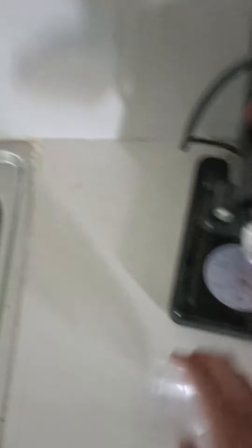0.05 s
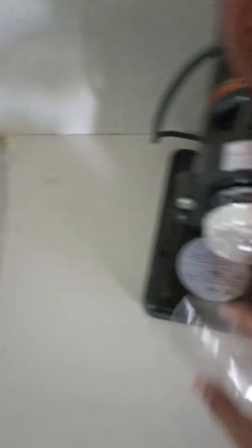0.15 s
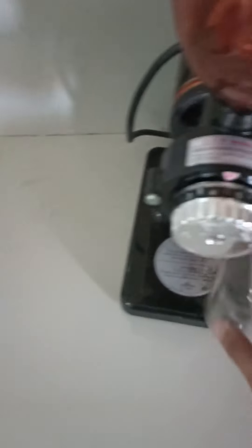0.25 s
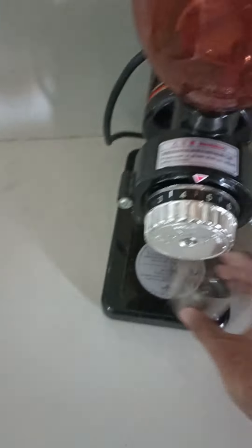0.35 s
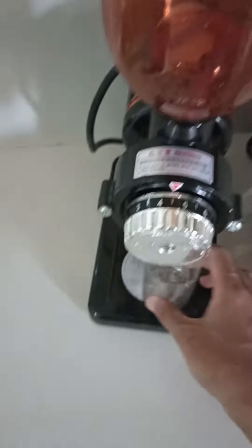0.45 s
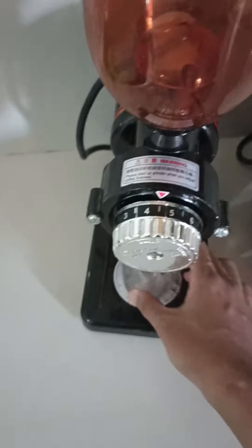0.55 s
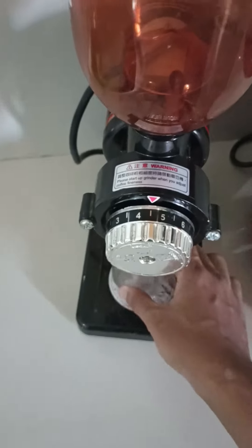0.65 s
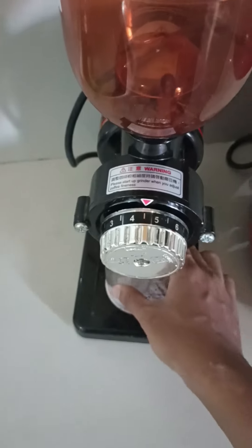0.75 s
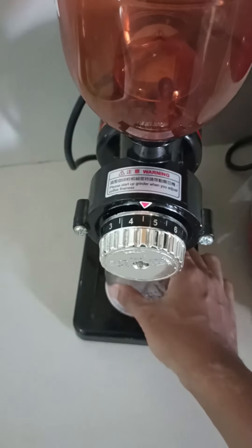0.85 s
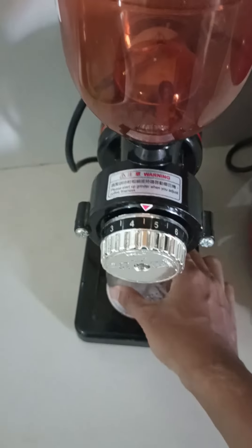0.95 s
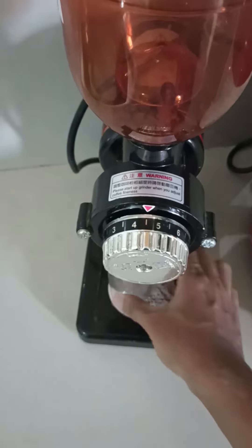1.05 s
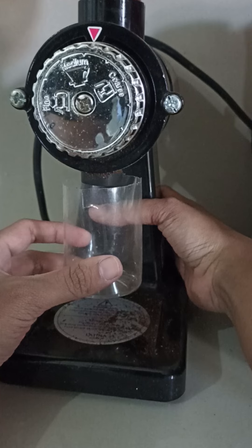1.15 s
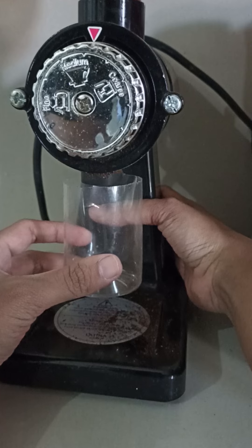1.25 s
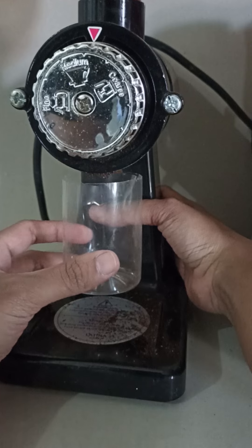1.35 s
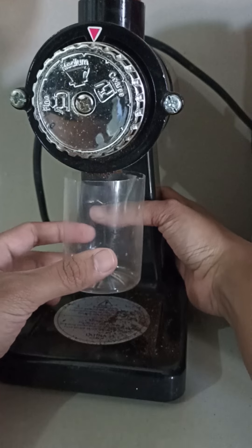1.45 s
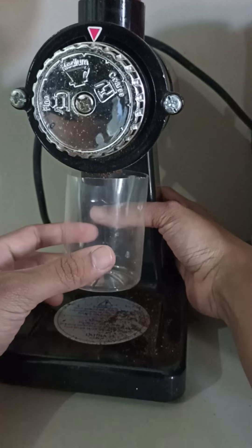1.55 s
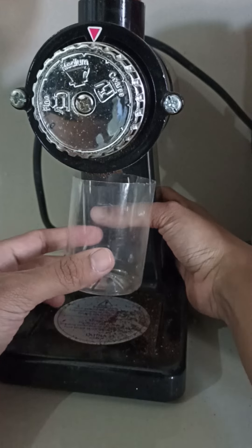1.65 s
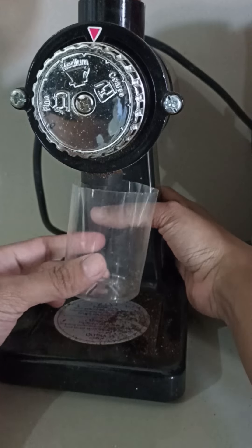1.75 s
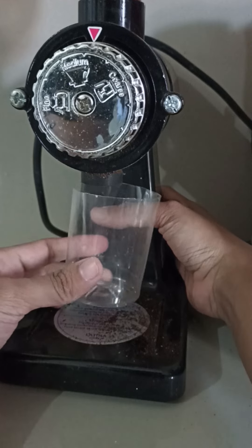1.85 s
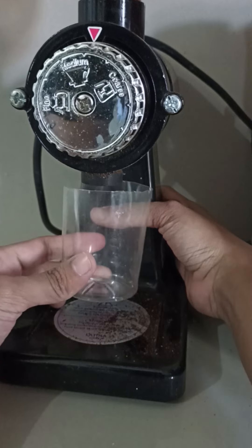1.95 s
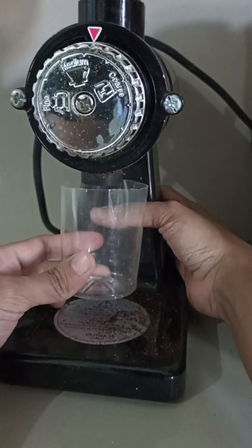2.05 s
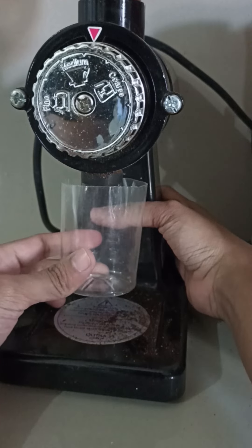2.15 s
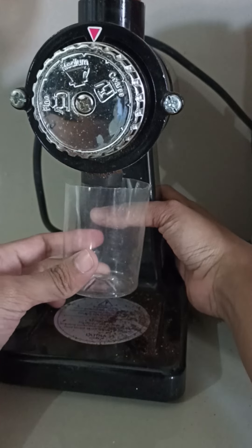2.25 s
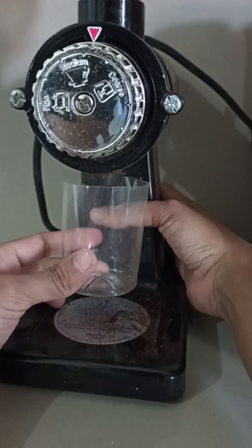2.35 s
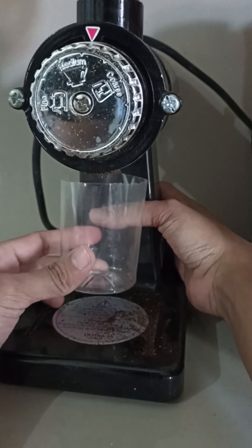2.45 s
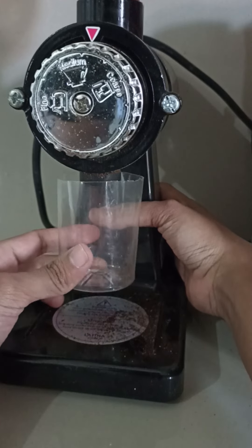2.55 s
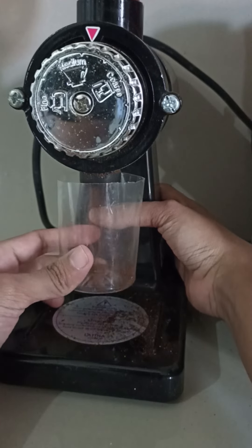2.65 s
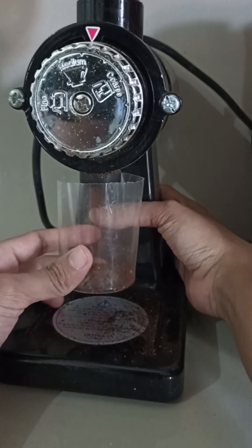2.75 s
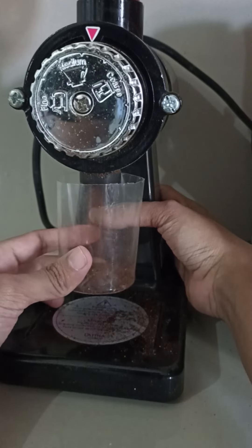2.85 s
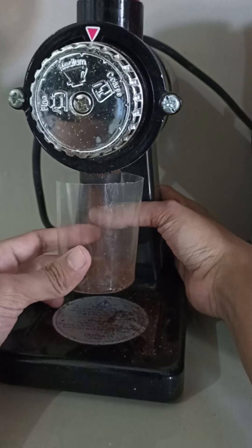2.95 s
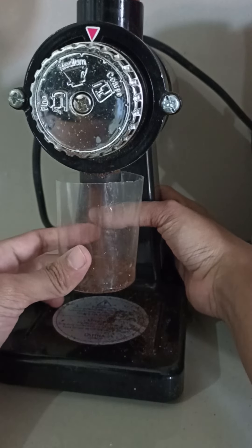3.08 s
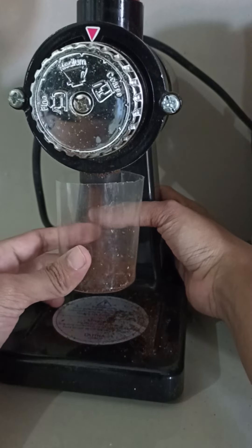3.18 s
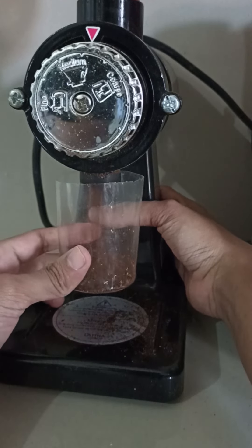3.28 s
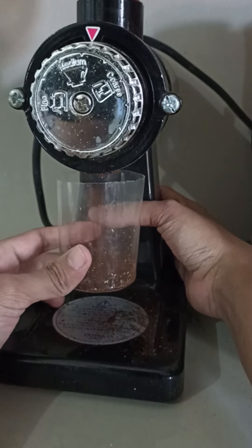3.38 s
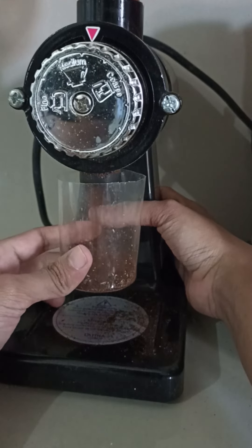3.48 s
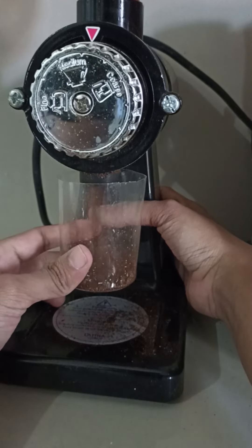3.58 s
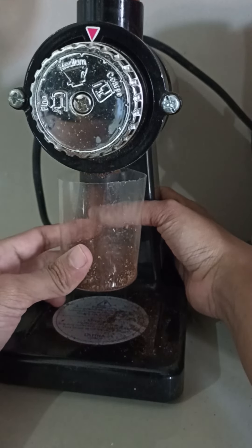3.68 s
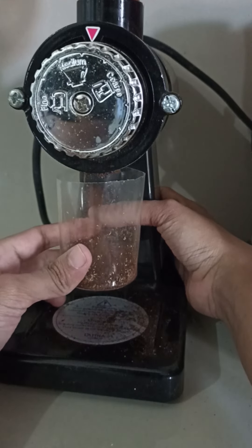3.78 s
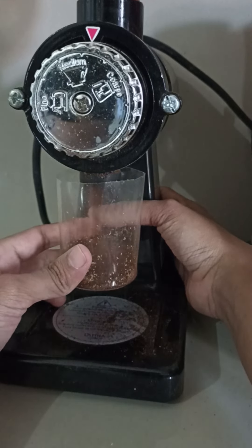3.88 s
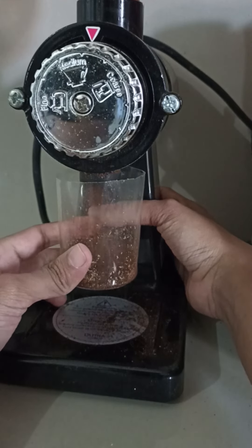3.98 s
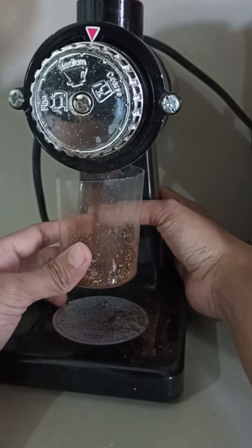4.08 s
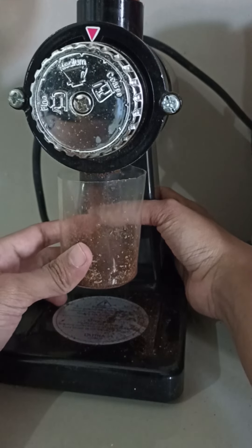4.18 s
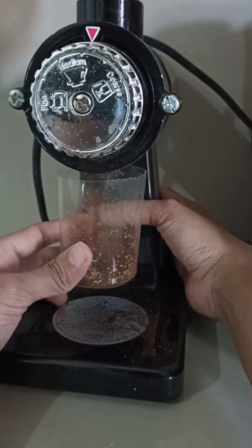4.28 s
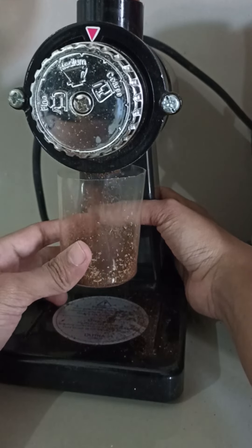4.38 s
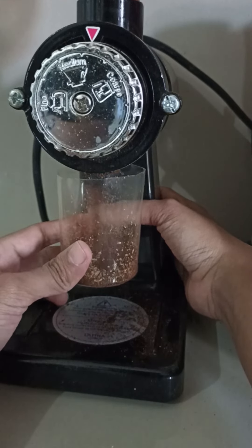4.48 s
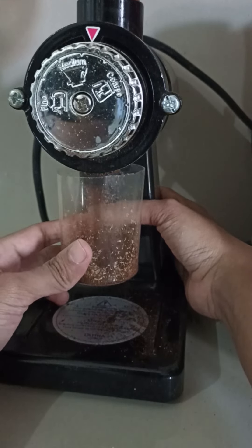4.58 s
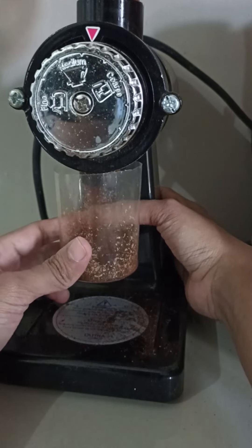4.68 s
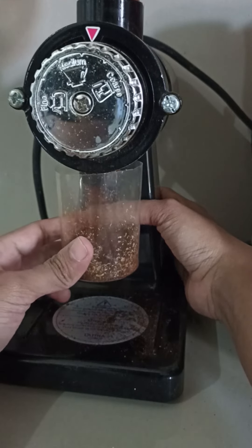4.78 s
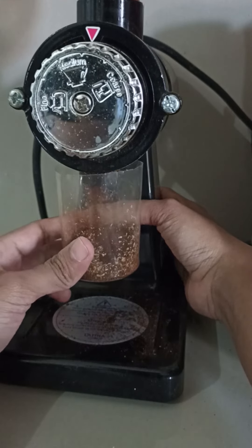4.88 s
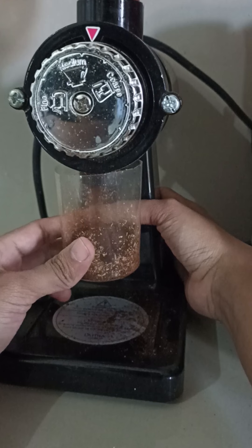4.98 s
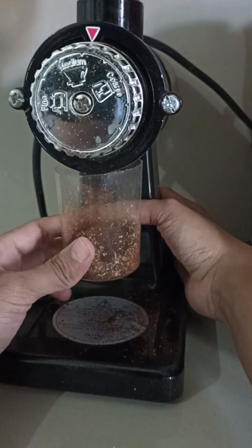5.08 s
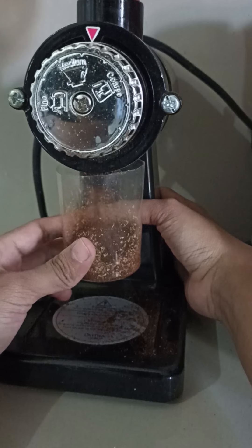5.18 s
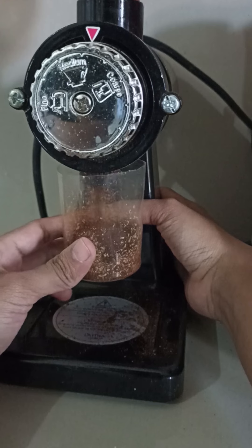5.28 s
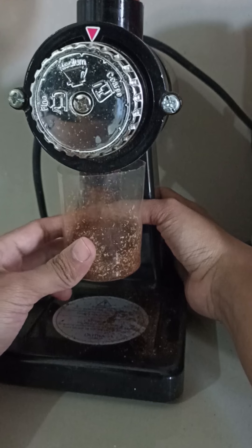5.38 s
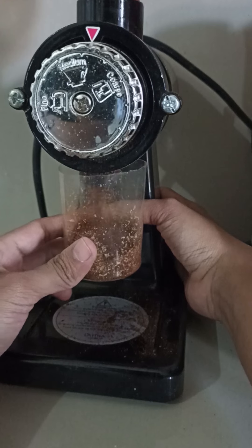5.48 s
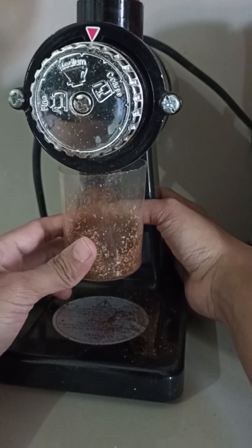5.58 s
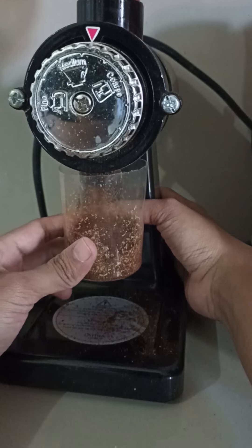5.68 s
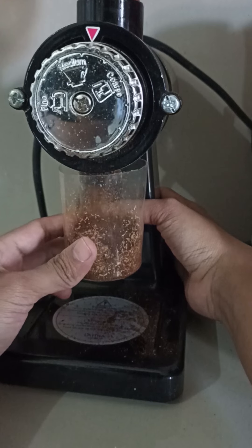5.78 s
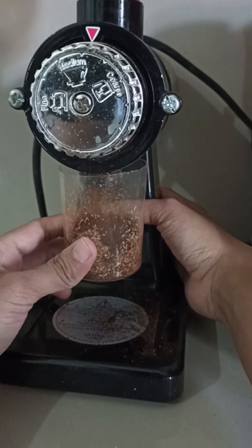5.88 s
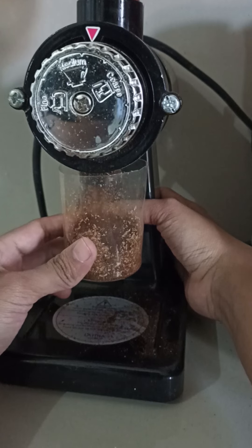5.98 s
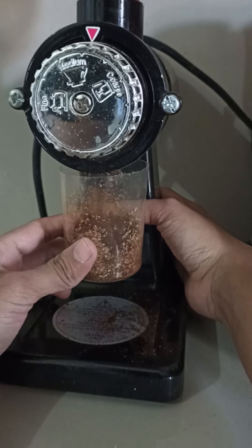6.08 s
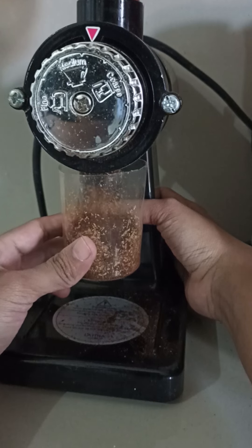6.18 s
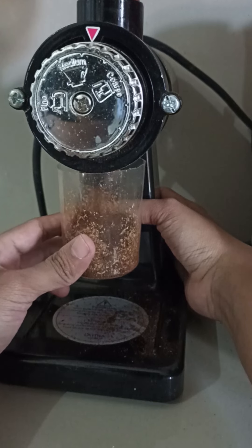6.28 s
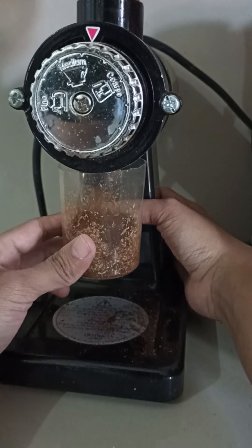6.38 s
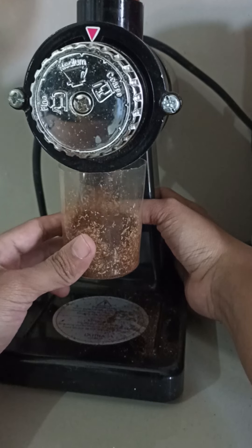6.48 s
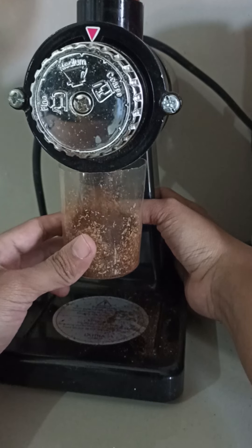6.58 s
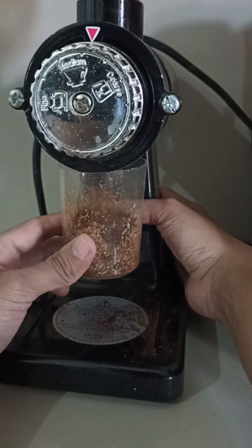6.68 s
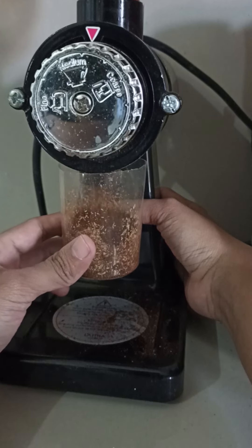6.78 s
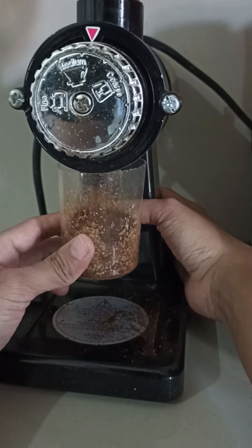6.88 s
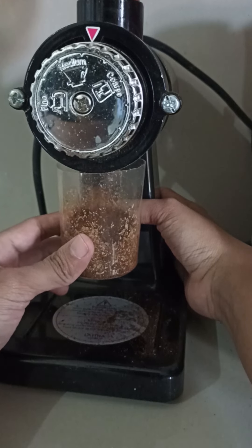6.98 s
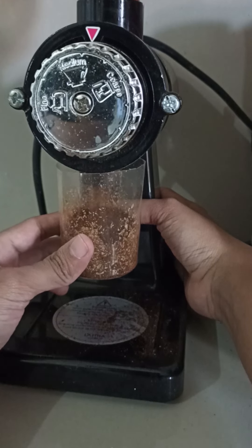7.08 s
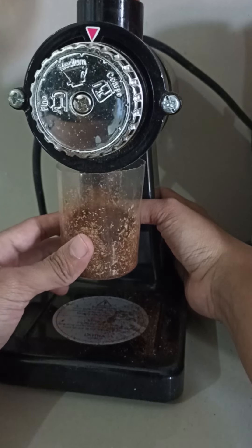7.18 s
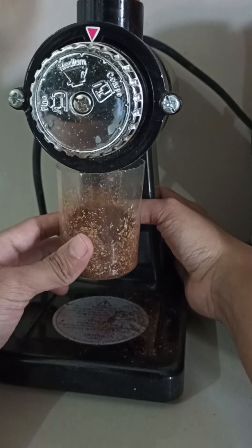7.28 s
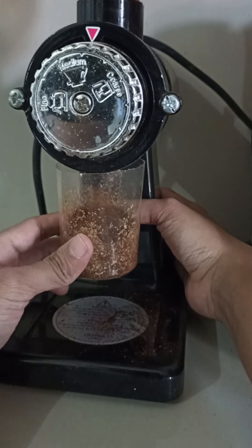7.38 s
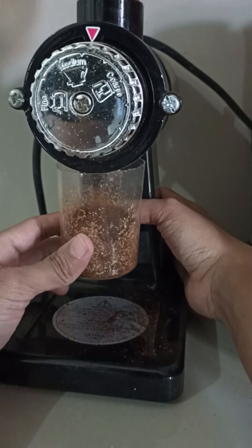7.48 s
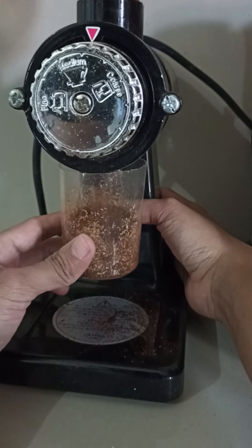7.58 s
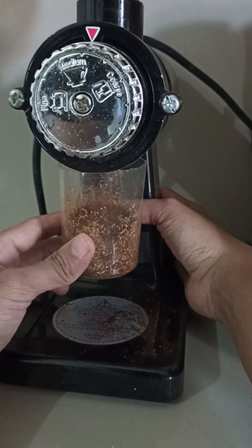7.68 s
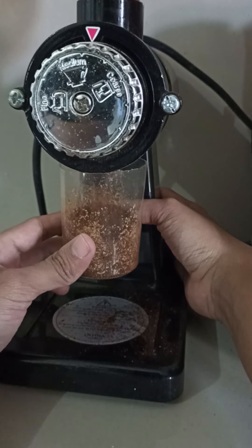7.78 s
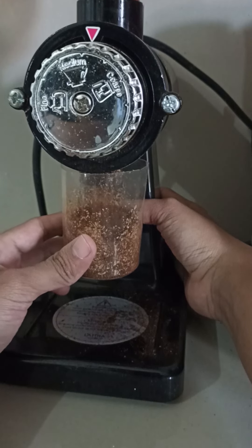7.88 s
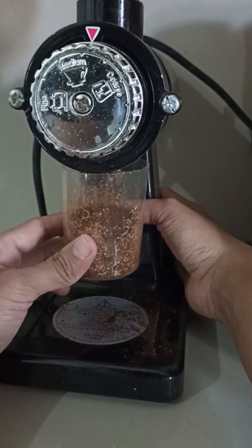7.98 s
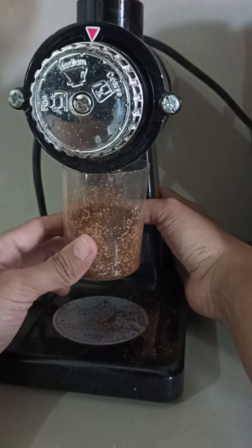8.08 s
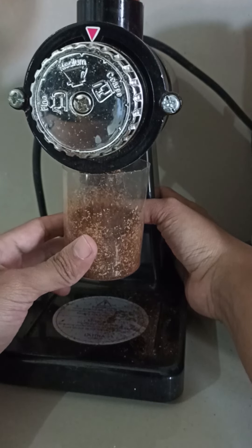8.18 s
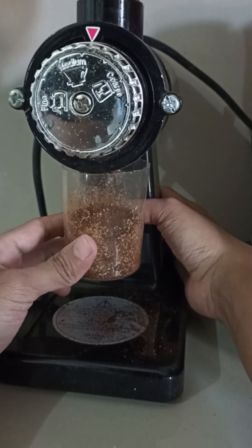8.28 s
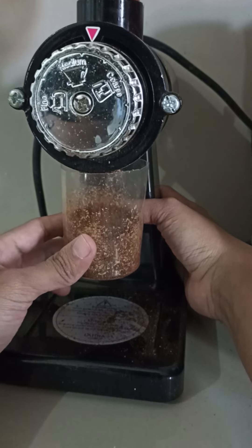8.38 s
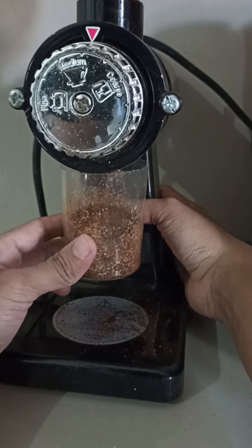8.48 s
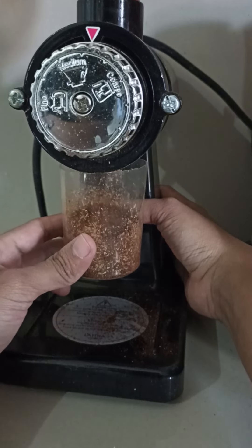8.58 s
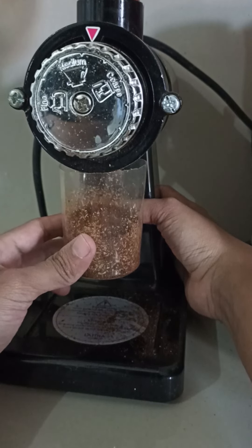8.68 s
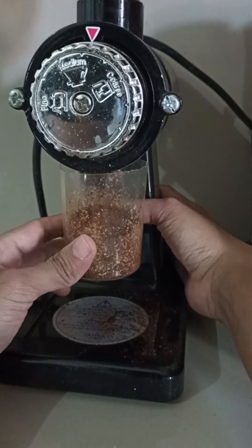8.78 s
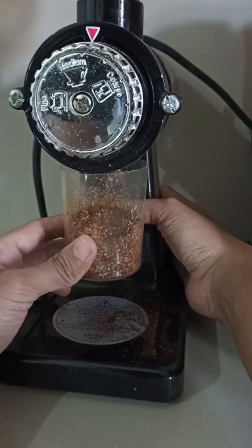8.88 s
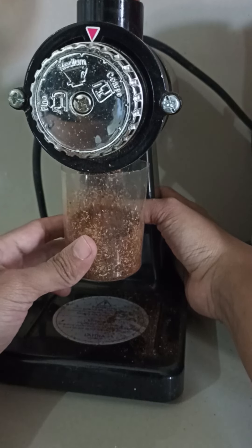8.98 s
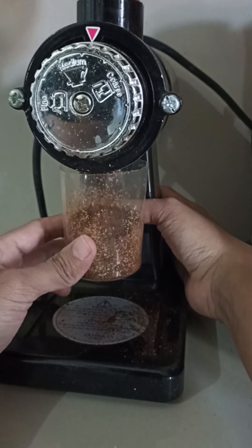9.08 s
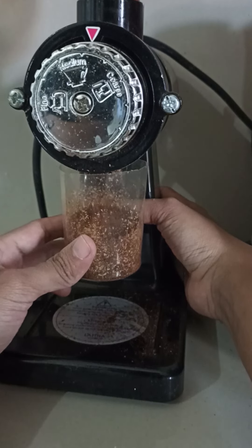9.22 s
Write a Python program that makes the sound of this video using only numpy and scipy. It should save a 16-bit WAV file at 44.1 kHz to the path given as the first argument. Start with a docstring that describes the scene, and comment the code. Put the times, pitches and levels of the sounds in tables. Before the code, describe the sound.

A quiet kitchen with soft room noise and a faint low hum that comes and goes, heard close up in stereo. A tiny hiss opens, with light crinkly plastic ticks at 0.2-0.4 s. At about 0.5 s the cup knocks the grinder base twice with a rattle between, a hollow low-mid ring trailed by hiss fading over half a second. Soft taps and a bump come near 0.9-1.1 s, then low hand rumble, with small taps around 1.85 s. At 2.5 s the motor clacks on and a loud, dense, gritty roar fills everything: crunching, thudding beans, bright grit, rough whine. It sags slightly until about 4.5 s, then gradually rises, with a brief squeak near 5.6 s and a hard crack at 6.3 s. Another squeak comes at 8.07 s; from 8.1 s the crunch thins abruptly, the motor speeds up and hums, and separate cracks scatter until the cut around 9.2 s.

```python
"""A kitchen counter, with an electric burr grinder close by. A plastic cup is knocked against its base and held
under the spout: struck modes ring and shaped noise hisses away in short tails. The motor starts with a clack
and the burrs crush beans: dense random breaks shake the resonances of the housing, and a rough whine follows
the shaft speed. As the beans run out the motor speeds up, its hum of sines comes through, and the last pieces
crack in separate bursts. A quiet room noise and a low hum that comes and goes lie underneath."""
import sys
import numpy as np
from scipy import signal
from scipy.fft import rfft, irfft
from scipy.io import wavfile
from scipy.ndimage import uniform_filter1d

SR = 44100
rng = np.random.default_rng(int(sys.argv[2]) if len(sys.argv) > 2 else 0)


def write(x):
    x = np.atleast_2d(x).T
    wavfile.write(sys.argv[1], SR, np.round(np.clip(x, -1, 1) * 32767).astype(np.int16))


N = 407925
TIME, BINS = np.arange(N) / SR, np.fft.rfftfreq(N, 1 / SR)  # seconds, Hz
START = 2.479  # the motor starts (s)

# mains hum of the motor's iron, before it wavers: [pitch_hz, level_db]
MAINS = [(100, -65), (300, -46.5), (400, -45)]


def burrs(speed, load_db, running):
    """Beans tumble, crack and are milled to grit; the sound thins out as the load falls."""
    load = amp(load_db)
    feed = np.clip(load, .5, 1)
    breaks = fractures(540 * feed, spread_db=0.0, ring_s=0.0038)
    breaks *= 1 + 0.097 * np.sin(2 * np.pi * MAINS[0][0] * TIME)  # the torque pulses with the mains
    breaks *= amp(1.8 * wander(110))  # beans drop in by clumps
    breaks = steady(abs(uniform_filter1d(breaks, size=80)))  # each gives way over two milliseconds
    crack = np.sqrt(0.08 + 1.12 * breaks) * load
    middle = amp(-2.5) * hiss(above(760) * below(4150)) + amp(-11.5) * whine(speed, width_hz=84)
    bright = grit(speed, load_db, breaks) * hiss(above(3260))
    return running * (tumbling(load_db, breaks) + crack * middle + bright)


def grit(speed, load_db, breaks):
    """Level of the bright grit: the rim of the burrs fills at the start, and a faster shaft throws it harder."""
    level_db, knee_db, fill_s = -1.46, 1, 0.042
    throw_db, throw_from = 0.06, 81.3  # dB per turn per second, relative to this speed (turns per second)
    splinters = fractures(2200, spread_db=3.0, ring_s=0.000086)
    filled = 1 - np.exp(-np.maximum(TIME - START, 0) / fill_s)
    emptying_db = np.minimum(load_db - knee_db, 0)  # below the knee the grit follows the load
    grit_db = level_db + emptying_db + throw_db * (speed - throw_from)
    return np.sqrt(0.14 + 0.52 * breaks + 0.23 * splinters) * filled * amp(grit_db)


def tumbling(load_db, breaks):
    """Beans thud about in the throat and shake the frame; the fewer they are, the duller it sounds."""
    # heavy lurches of the beans: [time_s, level_db above the rumble]
    lurch_rows, lurch_s = [(2.489, 2.2), (2.555, 5.6), (2.862, 3.3), (3.005, 5.4), (3.985, 3.9),
                           (4.376, 3.4), (5.674, 4.8), (7.137, 3.2), (8.685, 4.3), (8.724, 6), (8.975, 2.3)], 0.011
    rumble_db, rumble_follows = -1.74, 0.21  # level at full load, dB per dB of load
    clatter_db, clatter_follows = -1, 0.86
    thuds = fractures(150, spread_db=1.5, ring_s=0.0053)
    lurch = sum(amp(db) ** 2 * np.exp(-((TIME - s) / lurch_s) ** 2) for s, db in lurch_rows)
    power = 0.19 + 0.42 * breaks + .5 * steady(thuds) + lurch
    shake = np.sqrt(power) * amp(0.17 * wander(14))
    rumble = amp(rumble_db + rumble_follows * load_db) * hiss(below(585))
    clatter = amp(clatter_db + clatter_follows * load_db) * hiss(above(495) * below(1270))
    return shake * (rumble + clatter)


def whine(speed, width_hz):
    """The teeth pass about thirty times a turn and strike beans at uneven moments: a rough, gliding note."""
    uneven = colour(rng.standard_normal((2, N)), below(width_hz, order=1) * below(610))
    uneven = np.sign(uneven) * np.sqrt(steady(uneven ** 2))
    return ports(unit(uneven * teeth(speed)), 0.61)


def teeth(speed):
    """The note of the passing teeth, a sine that glides with the shaft and wavers a little."""
    teeth_per_s = 29.8 * speed * (1 + .01 * wander(14))
    return np.cos(2 * np.pi * np.cumsum(teeth_per_s) / SR)


def squeaks(speed):
    """A caught bean is struck by tooth after tooth, and the note turns clean for a moment."""
    # beans caught between the teeth: [time_s, relative level_db]
    squeak_rows, squeak_s = [(5.579, 0), (5.603, -16), (8.07, 1.5)], 0.0063
    level = sum(amp(db) * np.exp(-((TIME - s) / squeak_s) ** 2) for s, db in squeak_rows)
    return amp(-8.5) * level * teeth(speed)


def snaps(load_db, running):
    """The loudest beans snap at set times, from the first bite to the last pieces, lesser ones by chance."""
    # the loudest snaps, before the housing: [time_s, body_db, treble_db]
    loud_rows = [(2.4793, 11.5, -1), (2.4884, 6, -8), (2.496, 9.5, -12), (2.5717, 9, -6), (2.913, 6, 0),
                 (3.129, 7, -2), (3.342, -12, -13), (4.9603, -7, -9), (5.284, -1, -5), (5.7749, 1, -5),
                 (6.198, 2, -5), (6.3262, 10, 3), (6.388, 4.5, 2), (6.9697, -4, -12), (7.5309, -11, -1),
                 (8.0433, -8, -7), (8.11, -3, 0), (8.145, -4, -3), (8.2372, 1, -3), (8.2798, -3, -5),
                 (8.2943, -7, -8), (8.3192, -4, -13), (8.3531, 0, -4), (8.3994, 4.5, -5), (8.431, -12, -4),
                 (8.4549, -11, -12), (8.5118, -1, -10), (8.5477, -12, -7), (8.622, 2, 1.5),
                 (8.6617, -15, -5), (8.679, -16, -7), (8.7092, 5.5, 1.5), (8.7437, -4, 1),
                 (8.769, -2.5, -1), (8.8261, -14, -11), (8.895, -2, -3), (8.909, -9, -2), (8.9411, -12, -1),
                 (8.9777, -15, -7), (9.0455, 2.5, -9), (9.088, -21, -5.5), (9.136, 0, -2), (9.151, -4, -13),
                 (9.1965, -12, -2.5)]
    return cracks(np.vstack([loud_rows, chance_snaps(load_db, running)]), ring_s=0.0029)


def chance_snaps(load_db, running):
    """Rows of lesser snaps, rarer and softer as the load falls."""
    snaps_per_s, body_db, treble_db = 9, 1.5, -21  # at full load
    chance = running * amp(load_db) ** 2 * snaps_per_s / SR
    at = np.flatnonzero(rng.random(N) < chance)
    return np.column_stack([TIME[at], load_db[at, None] / 2 + [body_db, treble_db]])


def cracks(rows, ring_s):
    """Large breaks: short showers of splinters, each with its own share of treble."""
    s, body_db, treble_db = np.transpose(rows)
    splinters = 0.29 + 0.76 * fractures(2500, spread_db=2.5, ring_s=0.000092)

    def shower(db):
        power = fade(impulses(s, amp(db) ** 2), ring_s)
        return np.sqrt(splinters * abs(uniform_filter1d(power, size=60)))

    body = shower(body_db) * hiss(above(880, order=2) * below(3470))
    return body + shower(treble_db) * hiss(above(5900))


def housing(x):
    """The resonances of the machine ring after whatever shakes it."""
    # broad colour of the machine: [frequency_hz, left_db, right_db]
    body_colour = [(30, -34, -30), (99, -67, -39), (215, -19, -21), (297, -24, -28.5), (410.5, -5.5, -5.5),
                   (780, -18, -13.5), (1110, -24.5, -21.5), (1837, -12.5, -11), (3397, -19.5, -15.5),
                   (4080, -32.5, -31), (5100, -18.5, -20.5), (10700, -18.5, -27.5), (12150, -10.5, -28),
                   (16500, -24, -19)]
    # resonances of housing, hopper and burrs, added to it: [centre_hz, width_hz, left_db, right_db]
    resonances = [(368, 34, 3, 4.5), (581.6, 15, 12, 4), (1002, 107, 2, 7.5), (1428, 135, 5, 14),
                  (1604.5, 62, 9, 13), (2262, 490, 11.5, 11), (3213, 162, 13.5, 6), (4677, 550, 9.5, 5.5),
                  (6590, 480, 5.5, 8), (6790, 210, -1.5, 10.5), (8400, 950, -1, 14), (9800, 180, -15, 14),
                  (11750, 160, 1, 11), (11980, 350, 6, 8.5), (12830, 630, 11.5, 3), (14500, 240, 10, -7)]
    db = spectrum(body_colour)
    for hz, width, left_db, right_db in resonances:
        db = db + np.array([[left_db], [right_db]]) / (1 + (2 * (BINS - hz) / width) ** 2)
    cepstrum = irfft(np.log(amp(db.mean(0))), N)
    cepstrum[1:] *= 2 * (np.arange(1, N) < N // 2)  # causal: nothing rings before the blow
    phase = rfft(cepstrum).imag
    return colour(x, amp(db) * np.exp(1j * phase))


def motor(speed, running):
    """Shaft orders come forward as the shaft runs freer; the mains hum keeps its pitch."""
    # hum of the shaft, before speed and chance move its level: [multiple of the speed, level_db]
    shaft_orders = [(1, -61), (2, -48), (3, -36), (4, -39.5), (5, -41), (6, -42), (7, -47), (8, -38.5),
                    (9, -42), (10, -46.5), (11, -51)]
    turns = np.cumsum(speed * (1 + 0.002 * wander(25))) / SR
    free_db = np.interp(speed, [75.3, 83.7, 84.5, 95.0], [-12.0, -7, -1.0, -3.5])  # turns per second, dB
    masked_db = np.minimum(speed - 86, 0) * 0.28  # under load the orders above the third sink further
    shaft = 0
    for k, db in shaft_orders:
        level = amp(db + free_db + (k > 3) * masked_db + 1.6 * wander(9))
        shaft = shaft + level * np.sin(2 * np.pi * (k * turns + rng.random()))
    mains = sum(amp(db + 2.9 * wander(6)) * np.sin(2 * np.pi * hz * TIME) for hz, db in MAINS)
    return np.sqrt(2) * running * (shaft + mains)  # table levels are rms


def knocks():
    """The cup strikes the base and rings it, each time at a slightly different spot."""
    # knock, rattle and second knock: [time_s, strike_db, pitch_ratio, contact_db, contact_top_hz]
    knock_rows = [(0.4908, -24.5, .96, -38, 3600), (0.512, -35, 1.0, -40, 3400),
                  (0.55, -22, 1.035, -40, 2300)]
    # ring of the base, before the pitch ratio and strike level: [mode_hz, level_db, t60_s]
    base_modes = [(335, -19, 0.042), (390, -24, 0.11), (405, 10.5, 0.045), (590, -27, 0.037),
                  (894, -15, .09), (1030, -11.5, 0.08), (1790, -20, .04), (2720, -28, 0.033),
                  (3450, -29, .04)]
    out = 0
    for s, db, pitch, contact_db, top_hz in knock_rows:
        ring = struck(base_modes, pitch, swell_cycles=2.6)
        thud = signal.oaconvolve(impulses([s], [amp(db)]), ring)[:N] * amp([[-1], [1]])  # leans right
        contact = np.sqrt(fade(impulses([s], [amp(contact_db) ** 2]), 0.0023))
        out = out + thud + contact * quiet_noise(above(640) * below(top_hz, order=8))
    return out


def ticks():
    """Fingers tap the thin cup: a crinkling snap and a short hollow note."""
    # taps: [time_s, hollow_ring_db, snap_db, treble_db]
    tick_rows = [(0.1958, -46, -42, -54), (0.2947, -57, -43, -54), (0.3682, -60, -50, -66),
                 (0.924, -57, -59, -72), (1.122, -66, -58, -61), (1.831, -68, -53, -69),
                 (1.859, -47, -61, -70), (1.884, -53, -68, -72)]
    # hollow ring of the cup, before the pitch ratio and tap level: [mode_hz, level_db, t60_s]
    cup_modes = [(828, -6, 0.11), (910, -1, 0.078), (1027, -1, 0.071)]
    s, hollow_db, snap_db, treble_db = np.transpose(tick_rows)
    snap = np.sqrt(fade(impulses(s, amp(snap_db) ** 2), 0.0011))
    snap = snap * quiet_noise(above(830) * below(3100))
    edge = np.sqrt(fade(impulses(s, amp(treble_db) ** 2), 0.0015))
    edge = edge * quiet_noise(above(4500) * below(7000, order=1))
    ring = struck(cup_modes, pitch=0.98, swell_cycles=1.2)
    hollow = signal.oaconvolve(impulses(s, amp(hollow_db)), ring)[:N]
    return snap + edge + hollow


def hissing_tails():
    """A brief hiss at the outset and a tail after the knock: hollow ring and bright edge go before the middle."""
    # hissing tails: [start_s, level_db, rise_s, hold_s, fade_db_per_s, hollow_ring_db]
    tail_rows = [(0.0, -51, 0.002, 0.011, 127, -1), (0.492, -50, 0.024, 0.24, 42, 12.5)]
    # colour of the hiss, before its bands are balanced: [frequency_hz, level_db]
    hiss_colour = [(180, -59), (300, -22), (398, 3.5), (519, -23), (1040, -1.5), (1610, -18), (2070, -11.5),
                   (2840, -13), (3240, -11), (4990, -28), (10900, -29.5), (12100, -24), (16000, -38)]
    ring_fades, treble_fades, treble_db = 63, 34, 8.5  # extra fades in dB per s, treble level at the start
    gain, out = amp(spectrum(hiss_colour)), 0
    grain = np.sqrt(0.55 + 0.31 * fractures(120, spread_db=2, ring_s=0.0046))
    for s, db, rise_s, hold_s, fall, ring_db in tail_rows:
        noise, age = quiet_noise(gain), np.maximum(TIME - s, 0)
        ring = colour(noise, below(680)) * amp(ring_db - ring_fades * age)
        middle = colour(noise, above(750) * below(3600)) * grain
        treble = colour(noise, above(5800)) * amp(treble_db - treble_fades * age)
        level = amp(db - fall * np.maximum(age - hold_s, 0)) * np.minimum(age / rise_s, 1)
        out = out + level * (ring + middle + treble)
    return out


def hands():
    """A soft bump on the frame, then the low rumble of the hands that hold the cup until the motor runs."""
    # colour of the handling noise: [frequency_hz, relative level_db]
    handling_colour = [(65, -32), (110, -11), (188, -1), (285, -18), (355, -8), (554, -25), (619, -23),
                       (1000, -40), (1300, -62), (2200, -120)]
    # modes of the frame, before the pitch ratio and bump level: [mode_hz, level_db, t60_s]
    frame_modes = [(227, 1, 0.22), (390, -8, .16)]
    grip_s, bump_db, bump_decay_s, held_db = 1.115, -52, 0.19, -52
    bump = amp(bump_db) * np.exp(-np.maximum(TIME - grip_s, 0) / bump_decay_s)
    holding = gate(grip_s, START, edge_s=0.019) * (bump + amp(held_db + 2 * wander(13.0)))
    ring = struck(frame_modes, pitch=0.99, swell_cycles=1.2)
    frame = signal.oaconvolve(impulses([1.124], [amp(-38)]), ring)[:N]
    return frame + holding * quiet_noise(amp(spectrum(handling_colour)))


def background():
    """Room noise, and a low hum of narrow noise that swells now and then."""
    # colour of the quiet kitchen: [frequency_hz, relative level_db]
    kitchen_colour, kitchen_db = [(15, -51), (25, -65), (53, -8), (97, 3.5), (263, -8), (531, -8.5),
                                  (677, -14.5), (887, -15.5), (1230, -22), (1440, -21.5), (2910, -22.5),
                                  (3340, -29.5), (7310, -39), (12500, -37.5), (16000, -41)], -53.5
    # swells of the hum, added to its steady level: [start_s, end_s, level_db]
    swell_rows = [(1.6, 1.85, -55), (2.345, 2.85, -50), (3.4, 3.65, -56), (4.605, 5.096, -60),
                  (6.26, 7.016, -54.5), (7.0, 7.9, -56.5)]
    hum_db, hum_edge_s = -67.5, 0.093
    floor = amp(kitchen_db) * quiet_noise(amp(spectrum(kitchen_colour)) * above(79, order=2))
    swells = amp(hum_db) + sum(amp(db) * gate(start, end, hum_edge_s) for start, end, db in swell_rows)
    return floor + swells * quiet_noise(above(100, order=8) * below(85, order=8))


def room(x, t60, wet_db):
    """Adds the short tail of a kitchen corner, too small to hold bass."""
    t = np.arange(SR * 2 // 3) / SR
    tail = rng.standard_normal((2, len(t))) * amp(-60 * t / t60) * (t > .004)
    tail /= np.linalg.norm(tail, axis=1, keepdims=True)
    return x + amp(wet_db) * signal.oaconvolve(colour(x, above(440, order=2)), tail, axes=1)[:, :N]


def hiss(gain):
    """Coloured noise from the machine."""
    return ports(rng.standard_normal((2, N)), gain)


def ports(pair, gain):
    """Two unrelated sounds become what the two sides hear, partly alike and shifted in phase."""
    # how the two sides hear the machine: [frequency_hz, likeness 0-1, left_lead_radians]
    side_rows = [(60, .92, 0), (450, .98, .1), (580, .66, .8), (750, .8, -.1), (1000, .3, 0),
                 (1600, .72, .9), (1850, .7, 4.2), (2230, .95, 4.1), (2800, .6, 6), (3400, .6, 8.6),
                 (5000, .45, 15), (8000, .5, 25), (12000, .55, 42), (16000, .4, 54)]
    like, lead = spectrum(side_rows)
    like = np.clip(like, 0, 1)
    a, b = rfft(pair)
    right = like * np.exp(-1j * lead) * a + np.sqrt(1 - like ** 2) * b
    return irfft(np.array([a, right]) * gain, N)


def quiet_noise(gain):
    """Diffuse noise, alike on both sides in the bass, with a middle of rms one."""
    # left minus right of the quiet sounds: [frequency_hz, difference_db]
    lean_rows = [(100, 1.5), (380, -2), (1290, -1), (2400, -6), (4400, -2.5), (8100, -8), (13000, 15)]
    a, b, shared = rfft(rng.standard_normal((3, N)))
    pair = np.array([a, b]) * above(780, order=1) + shared * below(460, order=1)
    x = irfft(pair * gain * amp(spectrum(lean_rows) * [[.5], [-.5]]), N)
    return x / np.std(x.mean(0))


def fractures(per_s, spread_db, ring_s):
    """Power of a random stream of breaks, their sizes spread in dB, with a mean of one."""
    sizes = amp(spread_db * np.clip(rng.standard_normal(N), -2.2, 2.2)) ** 2
    power = fade(sizes * (rng.random(N) < per_s / SR), ring_s)
    return power / power.mean()


def struck(modes, pitch, swell_cycles):
    """The ring of a struck thing: decaying sines that build up over their first cycles."""
    t = np.arange(SR // 3) / SR
    ring = 0
    for hz, db, t60 in modes:
        swell = 1 - np.exp(-t * hz / swell_cycles)
        ring = ring + amp(db - 60 * t / t60) * np.sin(2 * np.pi * pitch * hz * t) * swell
    return ring


def steady(power):
    """Holds the running mean of a power near one, as burrs drawing beans evenly; its quick bursts stay."""
    even_s = 0.11  # clumps and gaps cancel over this time
    return power / (abs(uniform_filter1d(power, size=int(even_s * SR))) + 1e-9)


def fade(power, seconds):
    """Lets every impulse die away with a time constant."""
    return signal.lfilter([1], [1, -np.exp(-1 / (seconds * SR))], power + 1e-20)


def impulses(times, sizes):
    """Single impulses at the given times."""
    return np.bincount(np.round(np.asarray(times) * SR).astype(int), sizes, N)[:N]


def wander(per_s):
    """Smooth chance with an rms of one, from random points joined by lines."""
    knots = rng.standard_normal(N // 40)
    return unit(np.interp(TIME * per_s, np.arange(len(knots)), knots))


def gate(start, end, edge_s):
    """One between two times, with straight edges centred on them."""
    return np.clip(np.minimum(TIME - start, end - TIME) / edge_s + .5, 0, 1)


def curve(rows):
    """The columns of a table of (s, ...) at every sample."""
    s, *columns = np.transpose(rows)
    return [np.interp(TIME, s, c) for c in columns]


def spectrum(rows):
    """The columns of a table of (Hz, ...) at every frequency."""
    hz, *columns = np.transpose(rows)
    return np.array([np.interp(np.log(BINS + 1), np.log(hz), c) for c in columns])


def colour(x, gain):
    """Filters by a gain at every frequency."""
    return irfft(rfft(x) * gain, N)


def above(hz, order=4):
    """Gain of a high-pass."""
    return 1 / np.sqrt(1 + (hz / (BINS + 1)) ** (2 * order))


def below(hz, order=4):
    """Gain of a low-pass."""
    return 1 / np.sqrt(1 + (BINS / hz) ** (2 * order))


def amp(db):
    """Decibels to gain."""
    return 10 ** (np.asarray(db) / 20)


def unit(x):
    """Scales to an rms of one."""
    return x / np.sqrt(np.mean(x ** 2) + 1e-20)


def scene():
    """The grinder, the handling before it and the quiet kitchen, summed."""
    # shaft speed, sagging under load: [time_s, turns_per_s]
    speed_rows = [(2.6, 76.1), (3.0, 75.7), (3.4, 73.6), (3.8, 74.7), (4.2, 71.4), (4.8, 71.7), (5.0, 74.9),
                  (5.6, 76.7), (5.8, 79.3), (6.6, 79.4), (7.0, 81.7), (7.35, 85.3), (7.7, 86.4),
                  (7.97, 85.3), (8.2, 90.4), (8.75, 94.2), (9.25, 94.6)]
    # load on the burrs, near full until the hopper empties, then last clumps: [time_s, db re full load]
    load_rows = [(2.53, -7), (2.58, -1), (4.0, 0.4), (6.95, -1), (7.3, -1.2), (8.03, -2.5), (8.14, -7.5),
                 (8.18, -10), (8.25, -7.5), (8.38, -8), (8.47, -14), (8.56, -11.5), (8.605, -16),
                 (8.66, -13.5), (8.72, -10), (8.8, -15), (8.87, -17.5), (8.91, -11.5), (9.0, -10),
                 (9.03, -14), (9.13, -18), (9.25, -19.5)]
    speed, = curve(speed_rows)
    load_db, = curve(load_rows)
    running = np.clip((TIME - START) / 0.014, 0, 1)
    shaken = burrs(speed, load_db, running) + snaps(load_db, running) + squeaks(speed)
    grinding = (TIME >= START) * colour(housing(shaken), above(63, order=1))
    grinder = room(grinding, t60=0.14, wet_db=-10.0) + motor(speed, running)
    cup = room(knocks(), t60=0.27, wet_db=-6) + room(ticks(), t60=.25, wet_db=-7)
    return grinder + cup + hissing_tails() + hands() + background()


def record(dry):
    """Rounds off the highest peaks, then removes the treble above a steep edge."""
    edge_hz = 15850
    excess = np.maximum(abs(dry) - .55, 0)
    rounded = dry - np.sign(dry) * (excess - .3 * np.tanh(excess / .3))
    lowpass = signal.firwin(511, edge_hz, window=("kaiser", 9), fs=SR)
    return signal.oaconvolve(rounded, lowpass[None], "same")


dry = scene()
out = record(dry)
write(out)
```